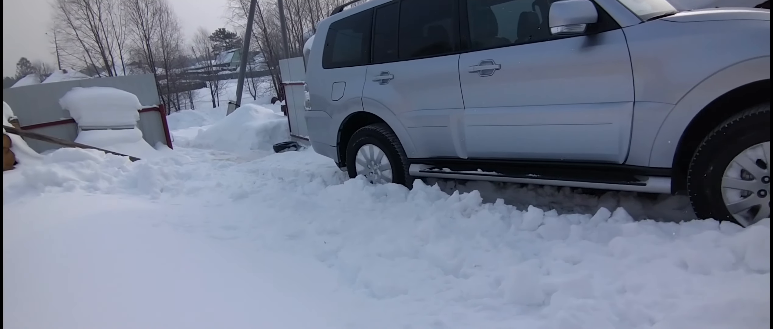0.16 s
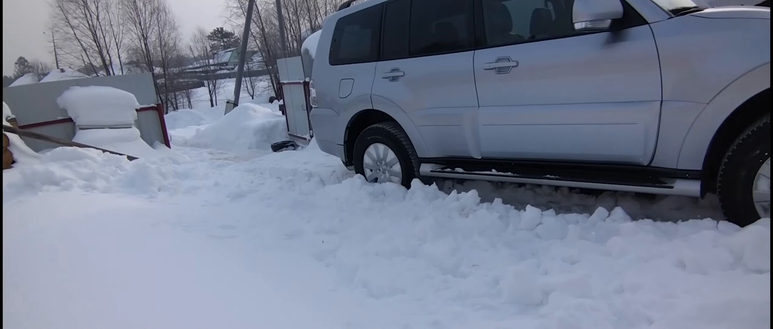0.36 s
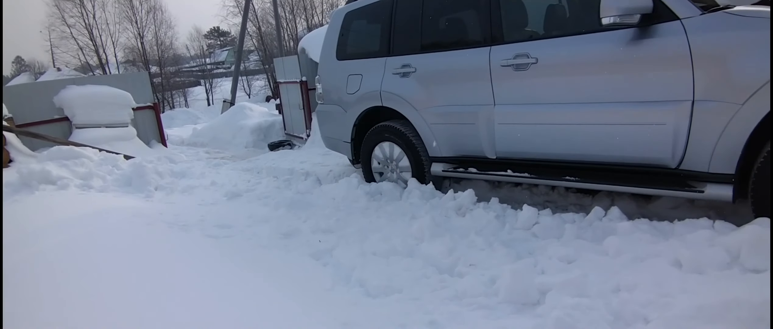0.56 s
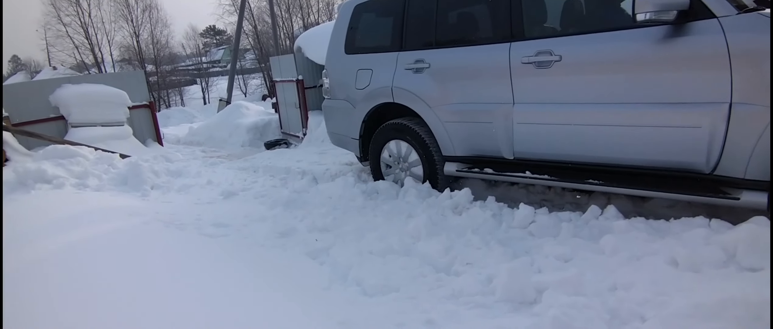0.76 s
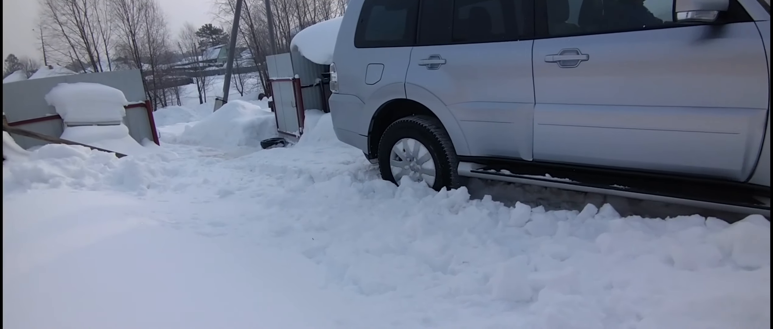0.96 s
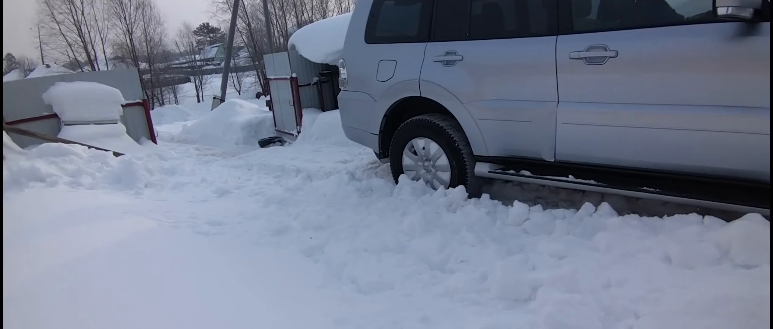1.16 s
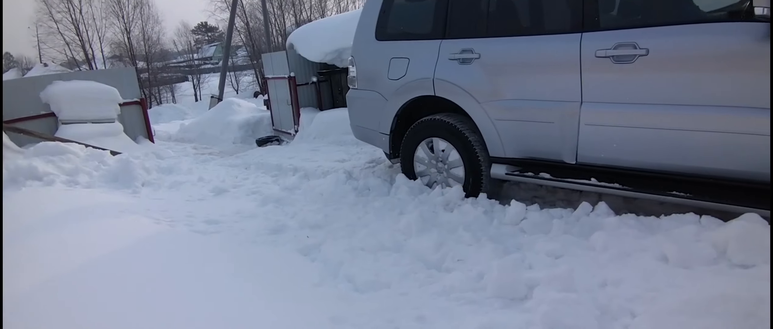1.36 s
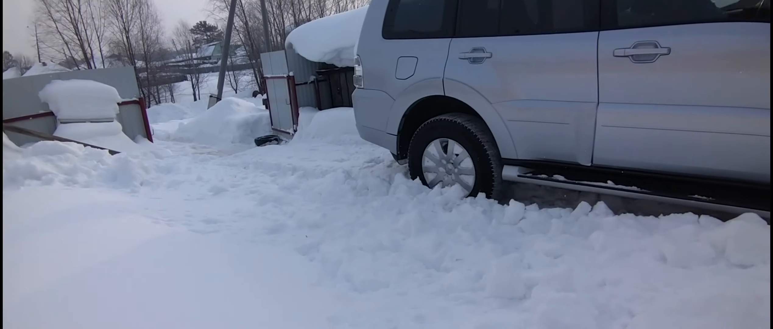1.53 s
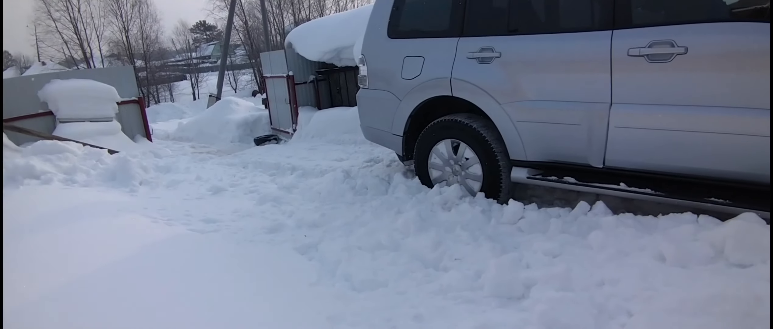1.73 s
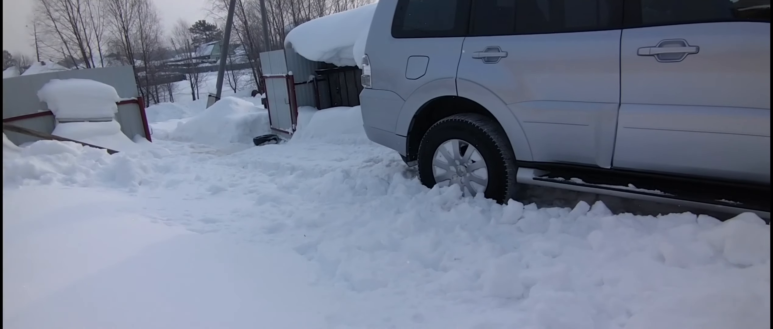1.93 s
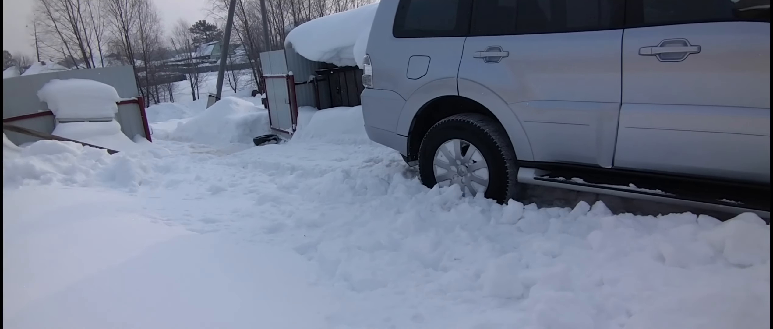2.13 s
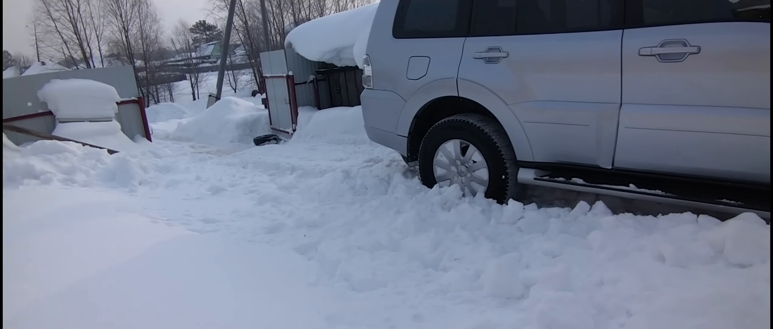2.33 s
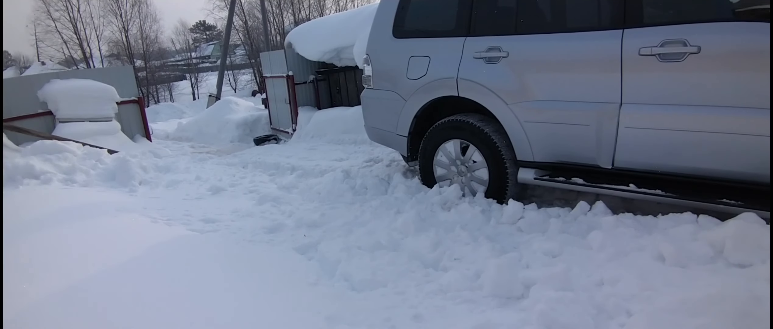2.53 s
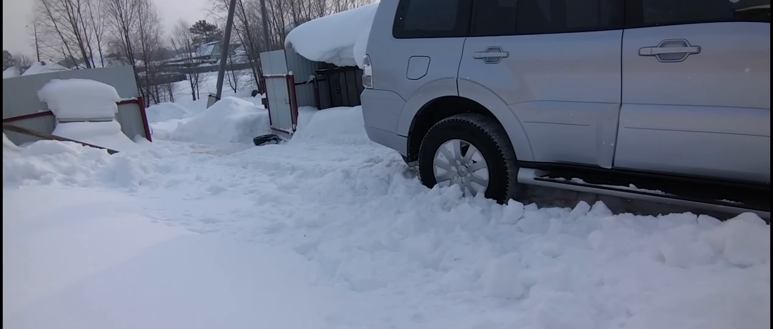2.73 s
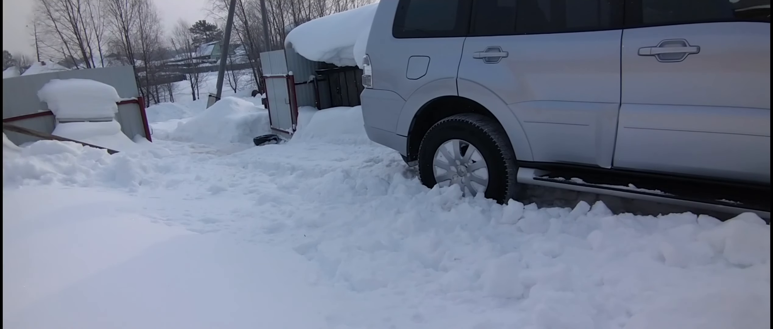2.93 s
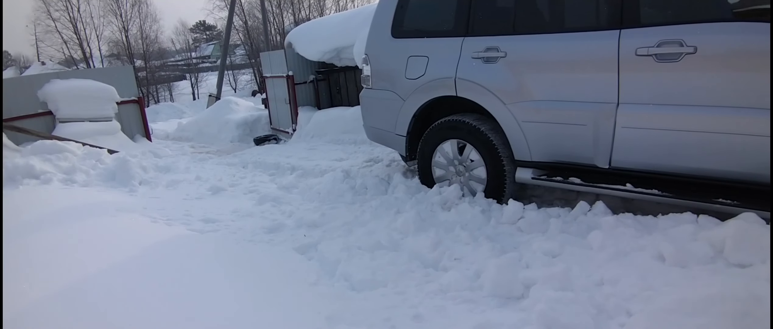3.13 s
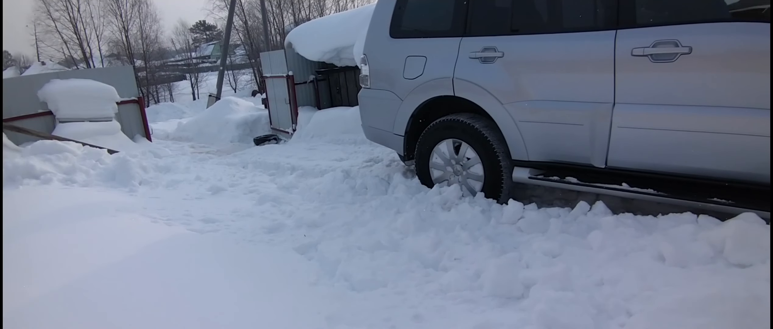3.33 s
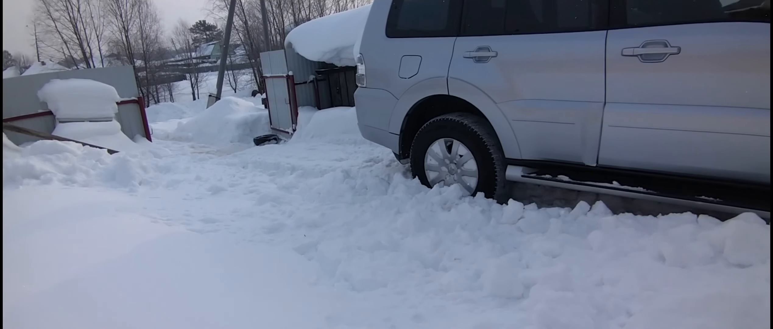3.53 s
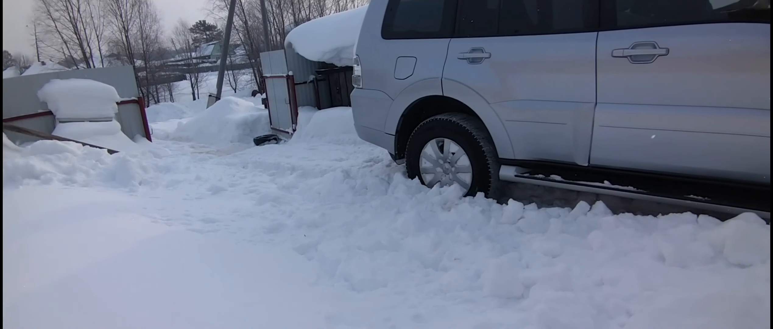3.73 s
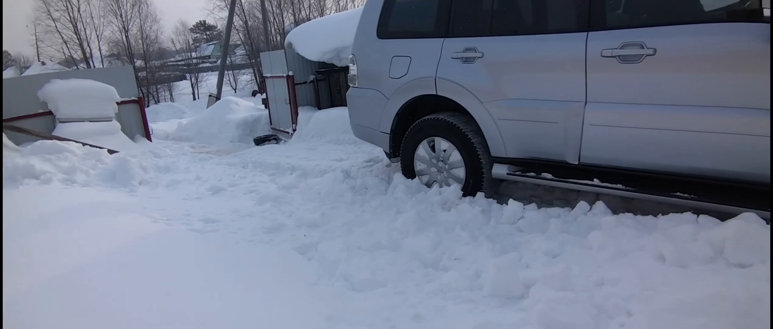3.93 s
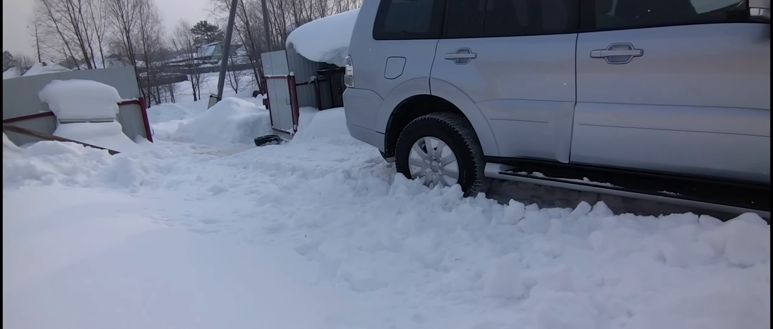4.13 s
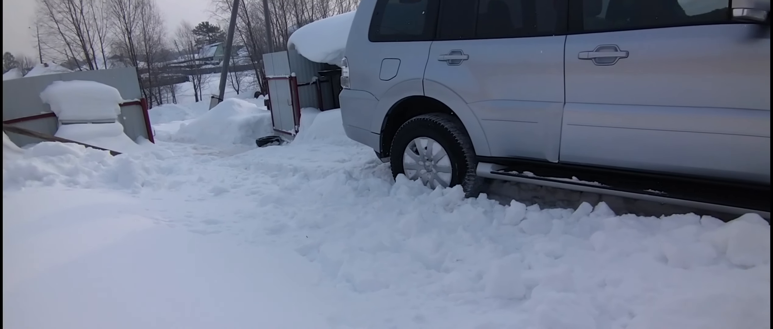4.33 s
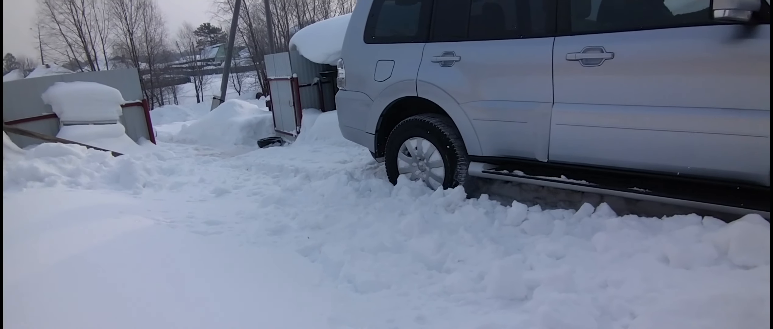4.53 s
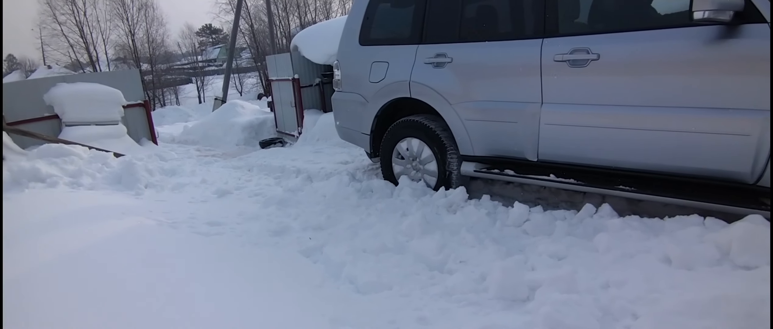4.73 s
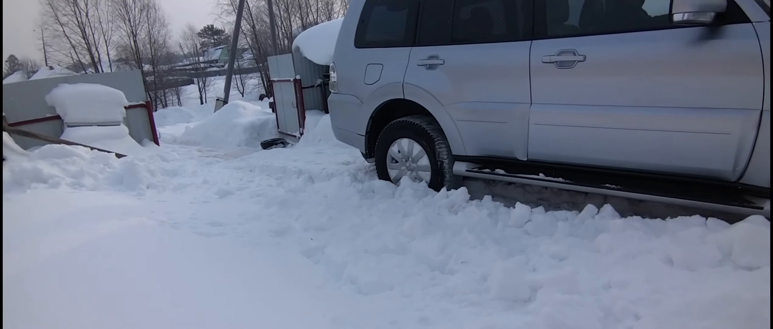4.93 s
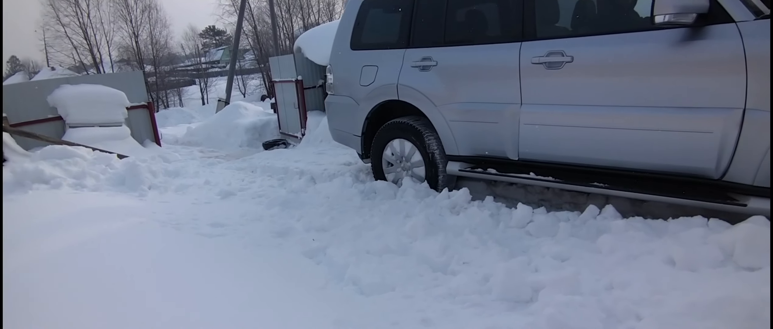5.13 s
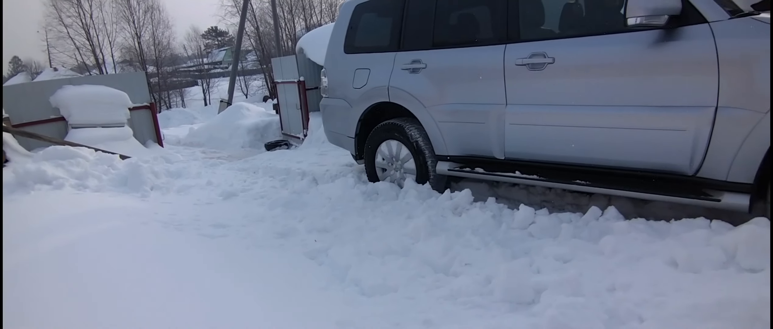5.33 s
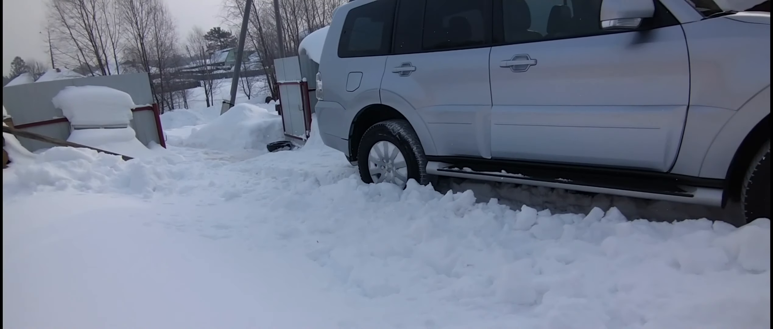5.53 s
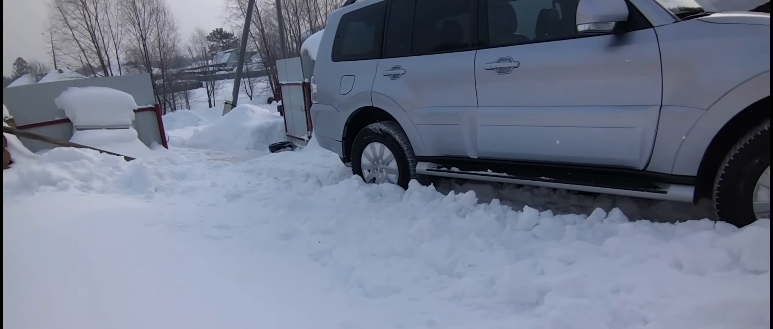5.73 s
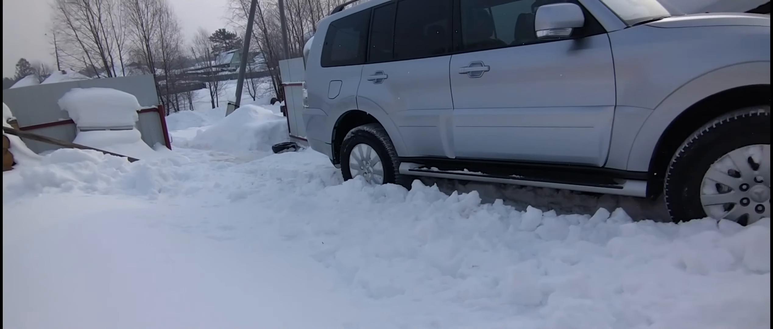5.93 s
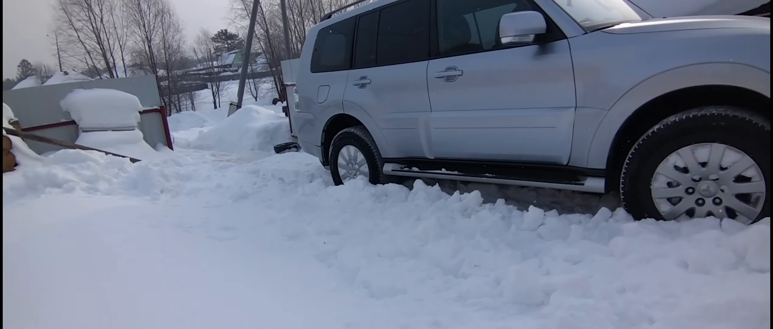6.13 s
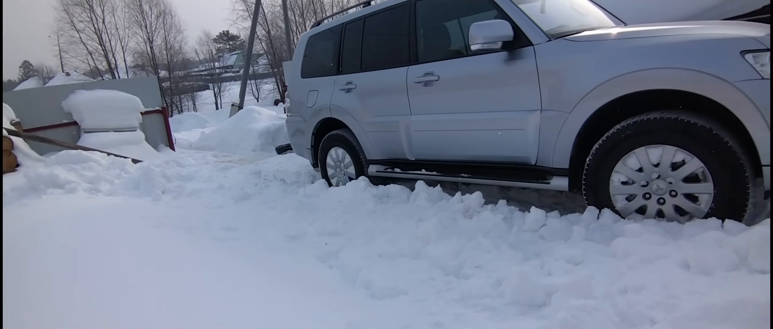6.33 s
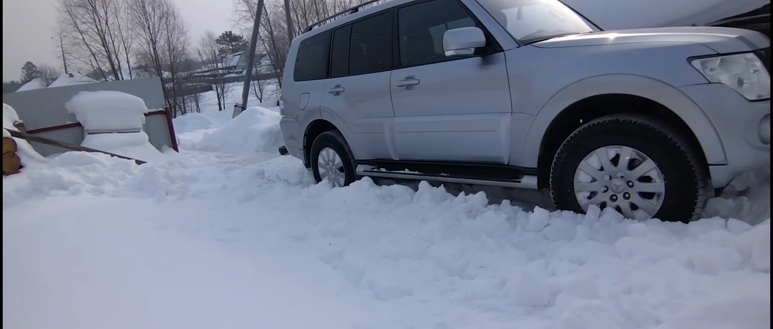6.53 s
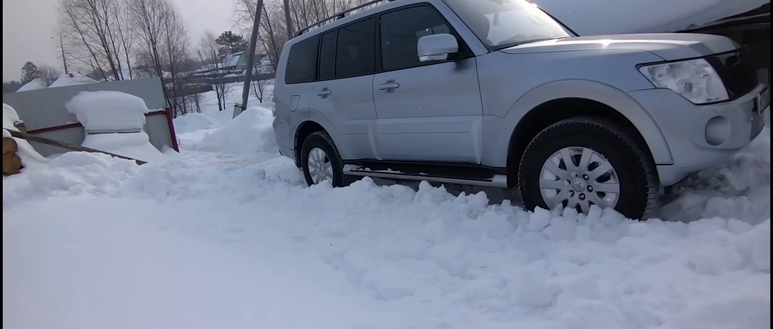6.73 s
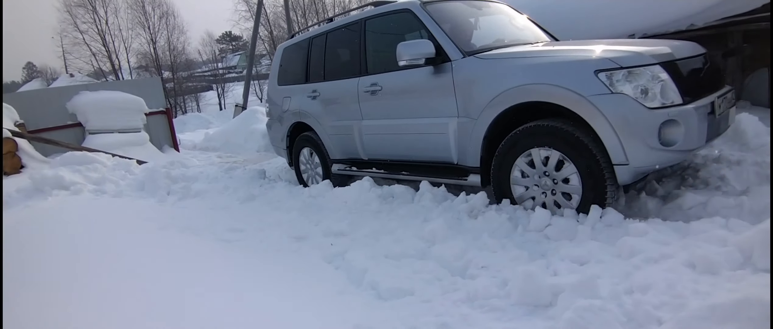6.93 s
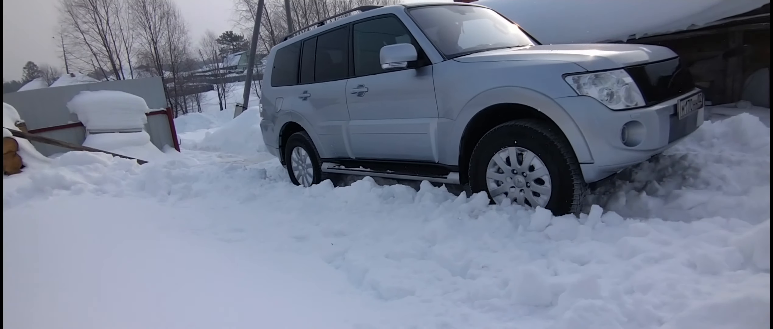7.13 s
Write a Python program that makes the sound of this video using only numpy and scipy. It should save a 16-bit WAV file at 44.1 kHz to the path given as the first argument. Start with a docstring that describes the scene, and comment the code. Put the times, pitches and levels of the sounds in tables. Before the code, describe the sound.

A diesel SUV clatters and crunches through deep snow, drops to an idle, then revs and groans its way back out.

```python
"""Diesel car in deep snow

A four-cylinder diesel SUV crawls through deep snow, stops at idle, then backs out again.
Engine: exhaust pulses at each firing, blows ringing in sump, head and block, a hum and a fan whirr.
Tyres: random collapses make the crunch, stick-slip the groans, moans and creaks; noise swells squeak and hiss.
Slipping treads throw a hiss of crystals; a faint low wind flutters at each microphone."""
import sys
import numpy as np
from scipy import signal
from scipy.fft import rfft, irfft, next_fast_len
from scipy.io import wavfile
from scipy.ndimage import uniform_filter1d, map_coordinates

SR = 44100
rng = np.random.default_rng(int(sys.argv[2]) if len(sys.argv) > 2 else 0)


def generate_wav(signal):
    """Clip the signal to [-1, 1] and save it as 16-bit WAV at the path in sys.argv[1]."""
    frames = np.transpose(np.atleast_2d(signal))
    scaled = np.clip(frames, -1, 1) * 32767
    pcm = np.round(scaled).astype(np.int16)
    wavfile.write(sys.argv[1], SR, pcm)


N = 320593
TIME_S = np.arange(N) / SR


def from_db(db):
    """Amplitude factor for a level in dB."""
    return 10 ** (np.asarray(db) / 20)


def rms_one(x):
    """Scale to rms 1 over all channels."""
    return x / np.sqrt(np.mean(x ** 2) + 1e-20)


def in_time(rows):
    """Each column of a curve, interpolated sample by sample."""
    time_s, *columns = np.transpose(rows)
    return [np.interp(TIME_S, time_s, column) for column in columns]


def at_hz(points, hz):
    """Gain of a spectrum at the given frequencies, interpolated over log frequency."""
    point_hz, db = np.transpose(points)
    return from_db(np.interp(np.log(hz + 1e-9), np.log(point_hz), db))


def colour(x, spectrum):
    """Shape a sound by a spectrum; rms 1."""
    size = next_fast_len(N + 8000)
    gain = at_hz(spectrum, np.fft.rfftfreq(size, 1 / SR))
    shaped = irfft(rfft(x, size) * gain, size)
    return rms_one(shaped[..., :N])


def lowpass(x, order, hz):
    """Butterworth low-pass."""
    return signal.sosfilt(signal.butter(order, hz, fs=SR, output="sos"), x)


def resonance(x, hz, width_hz):
    """Two-pole resonance with gain 1 on top."""
    r = np.exp(-np.pi * width_hz / SR)
    numerator = np.array([1, 0, -1]) * (1 - r * r) / 2
    return signal.lfilter(numerator, [1, -2 * r * np.cos(2 * np.pi * hz / SR), r * r], x + 1e-18)


def double_resonance(x, hz, width_hz):
    """A resonance followed by another of twice the width."""
    return resonance(resonance(x, hz, width_hz), hz, 2 * width_hz)


def die_away(x, seconds):
    """Every click becomes an exponential tail."""
    return signal.lfilter([1], [1, -np.exp(-1 / (seconds * SR))], x + 1e-18)


def ringing(x, hz, width_hz):
    """A resonance whose centre may move; rms 1."""
    turn = np.exp(2j * np.pi * np.cumsum(hz) / SR)
    return rms_one(np.real(turn * die_away(x / turn, 1 / (np.pi * width_hz))))


def drift(per_s):
    """Random wander with rms 1, drawn per_s times a second and joined by lines."""
    return rms_one(np.interp(TIME_S * per_s, np.arange(4000), rng.standard_normal(4000)))


def even(x):
    """Hold the level at 1 over an eighth of a second, keeping the grain."""
    return x / np.sqrt(uniform_filter1d(x ** 2, size=SR // 8) + 1e-6)


def grains(per_s, spread_db):
    """Random clicks of uneven size and sign."""
    sizes = from_db(spread_db * np.minimum(rng.exponential(1, N), 4))
    return (rng.random(N) < per_s / SR) * sizes * rng.choice([-1, 1], N)


def ticks(cycles):
    """A unit click whenever a whole cycle is completed."""
    return np.diff(np.floor(cycles), prepend=np.floor(cycles[0]))


def swell(centre_s, half_length_s):
    """A bell-shaped rise and fall around a moment; top 1."""
    return np.exp(-2 * ((TIME_S - centre_s) / half_length_s) ** 2)


def place(x, lag_ms, pan_db):
    """A source to the right reaches the left ear later and weaker."""
    left = map_coordinates(x, [np.arange(N) - lag_ms * SR / 1000], order=3, mode="nearest")
    return np.array([left, x]) * from_db(np.array([[pan_db], [-pan_db]]) / 2)


# Wind spectrum. Each row: frequency in Hz, relative level in dB per Hz.
WIND_SPECTRUM = [(10, -3), (22, 15), (34, -2), (60, -35), (150, -56), (400, -90)]


def wind(level_db=-57, gust_db=3):
    """Low coloured noise with slow gusts, different at each microphone."""
    return from_db(level_db + gust_db * drift(2.9)) * colour(rng.standard_normal((2, N)), WIND_SPECTRUM)


# Coarse crystals' hiss. Each row: frequency in Hz, relative level in dB per Hz.
SPIN_SPECTRUM = [(1200, -16), (2600, 7), (3400, -2), (4700, 12), (5500, 5), (6200, 9), (7600, -7),
                 (8800, 1), (11500, -1), (13500, 2), (16000, 3)]
SPIN_START_S, SPIN_END_S, SPIN_ATTACK_S, SPIN_RELEASE_S = 6.215, 6.68, 0.02, 0.07


def wheelspin(per_s=14000, spread_db=0.0, level_db=-55.5):
    """The spinning front wheel flings coarser crystals: one direct path, one scattered path for each ear."""
    attack = (TIME_S - SPIN_START_S) / SPIN_ATTACK_S
    release = (SPIN_END_S - TIME_S) / SPIN_RELEASE_S
    spinning = np.clip(np.minimum(attack, release), 0, 1)
    clicks = np.array([grains(per_s, spread_db) for _ in range(3)])
    return from_db(level_db) * spinning * colour(clicks, SPIN_SPECTRUM)


# Thrown crystals. Each row: time in seconds, relative level in dB.
SPRAY_LEVEL = [(0.0, -66.5), (0.03, -68), (0.92, -71.5), (0.98, -66.5), (1.63, -64), (2.14, -73),
               (2.87, -79.5), (4.2, -64.5), (4.37, -70.5), (5.35, -70), (5.9, -67.5), (6.1, -73.5),
               (6.7, -73), (7.27, -71)]
# Crystals' hiss. Each row: frequency in Hz, relative level in dB per Hz.
SPRAY_SPECTRUM = [(1000, -15), (2500, 11), (3400, 8), (4000, 8), (4800, 8.5), (5500, 5.5), (6200, 10.5),
                  (7000, 3.5), (7650, -4), (8600, 0.5), (11500, -3), (13500, 0), (16000, 2.5)]


def spray(lag_ms, level_db=9, per_s=26000, spread_db=1.0, flutter_db=1.5, direct_db=-3, pan_db=-6,
          treble_hz=7500, treble_db_per_ms=15, neutral_ms=0.37):
    """Ice crystals patter on wheel arches and snow, brighter as the front wheel comes into view."""
    crystals = colour(np.array([grains(per_s, spread_db) for _ in range(3)]), SPRAY_SPECTRUM)
    treble_filter = signal.butter(4, treble_hz, "high", fs=SR, output="sos")
    treble = signal.sosfiltfilt(treble_filter, crystals)
    crystals = crystals + treble * (from_db(treble_db_per_ms * (neutral_ms - lag_ms)) - 1)
    thrown = crystals * from_db(level_db + in_time(SPRAY_LEVEL)[0]) + wheelspin()
    thrown = thrown * from_db(flutter_db * drift(60))
    return from_db(direct_db) * place(thrown[0], lag_ms, pan_db) + thrown[1:]


# Soft collapsing snow. Each row: frequency in Hz, relative level in dB per Hz.
CRUNCH_SPECTRUM = [(100, -4), (200, -2), (280, -0.5), (400, -3), (550, -11.5), (750, -18), (1000, -24.5),
                   (1500, -52), (3000, -67)]
# Gritty crust. Each row: frequency in Hz, relative level in dB per Hz.
GRIT_SPECTRUM = [(300, 1), (700, 7.5), (950, 0.5), (1400, -2.5), (2500, -11), (6000, -24), (8000, -42)]
# Crispness, greatest where the wheels break out of rest. Each row: time in seconds, grit over crunch in dB.
CRISPNESS_CURVE = [(0, -4.5), (.7, -10), (2.1, -7.5), (3.0, 1.5), (3.5, -9), (4.0, -5.5), (4.7, -7.5),
                   (7.27, -12.5)]


def crunch(per_s=520, spread_db=2.5, clump_db=3.0, lump_db=0.78, grit_per_s=2500, grit_spread_db=3):
    """Snow fails under one tyre lump by lump, in clumps of tiny collapses; crisp crust adds finer grit."""
    clumps = from_db(clump_db * drift(60))
    soft = even(colour(grains(per_s * clumps, spread_db), CRUNCH_SPECTRUM))
    grit = even(colour(grains(grit_per_s * clumps, grit_spread_db), GRIT_SPECTRUM))
    lumps = rms_one(from_db(lump_db * drift(32)))
    return (soft + from_db(in_time(CRISPNESS_CURVE)[0]) * grit) * lumps


# Crust giving way. Each row: time in seconds, relative level in dB.
SLUMP_EVENTS = [(0.284, -29.5), (0.799, -34), (0.942, -25), (1.152, -27), (2.89, -38.5), (2.926, -43),
                (3.281, -34), (3.373, -29.5), (3.436, -31), (3.517, -36), (3.997, -31), (4.758, -30),
                (4.852, -35), (5.098, -28), (5.378, -30), (5.578, -30), (5.794, -26.5), (6.211, -28),
                (6.396, -30), (6.536, -33), (6.555, -34), (6.656, -36), (6.696, -44), (7.152, -31),
                (7.198, -31)]


def slumps(level_db=-1, thud_hz=230, width_hz=330, soft_hz=800):
    """A slab of crust breaks with a short dull thud."""
    clicks = np.zeros(N)
    for start_s, db in SLUMP_EVENTS:
        clicks[round(start_s * SR)] = from_db(db)
    thuds = lowpass(resonance(clicks, thud_hz, width_hz), 2, soft_hz)
    return -from_db(level_db) * thuds * clicks.max() / np.abs(thuds).max()


# Squeaks and hisses at the tyres.
# Each row: centre in seconds, half-length in seconds, frequency in Hz, width in Hz, level at the top in dB.
SQUEAK_EVENTS = [(1.103, 0.2, 5600, 1790, -60), (3.046, 0.063, 1890, 800, -57),
                 (3.595, 0.012, 1980, 400, -59), (3.847, 0.39, 5600, 1400, -76),
                 (5.688, 0.014, 5370, 1800, -52), (6.865, 0.049, 6100, 550, -61),
                 (7.18, 0.076, 2070, 346, -58)]


def squeaks_and_hisses():
    """Swells of noise, from short squeaks to long broad hiss."""
    out = np.zeros(N)
    for centre_s, half_length_s, hz, width_hz, db in SQUEAK_EVENTS:
        noise = double_resonance(rng.standard_normal(N), hz, width_hz)
        out += from_db(db) * rms_one(noise) * swell(centre_s, half_length_s)
    return out


# Tread blocks letting go. Each row: start in seconds, length in seconds, frequency in Hz, peak in dB.
CREAK_EVENTS = [(3.057, 0.058, 1795, -52), (3.463, 0.037, 692, -39), (3.513, 0.0089, 800, -41),
                (3.586, 0.041, 570, -42.5), (6.728, 0.018, 735, -38), (6.768, 0.017, 700, -47)]


def creaks(attack_s=0.0019, waver_hz=70):
    """Quick stick and slip on packed snow: a rough tone that starts quickly and runs out."""
    out = np.zeros(N)
    for start_s, length_s, hz, db in CREAK_EVENTS:
        age_s = TIME_S - start_s
        strength = np.clip(age_s / attack_s, 0, 1) * np.clip(1 - (age_s / length_s) ** 2, 0, 1)
        phase = 2 * np.pi * np.cumsum(hz + waver_hz * drift(400)) / SR
        out += from_db(db) * strength * np.sin(phase)
    return out


# Crust plates cracking. Each row: start in seconds, decay in seconds, frequency in Hz, peak in dB.
CRACK_EVENTS = [(0.942, 0.0077, 590, -38.5), (2.9, 0.032, 480, -46.5), (3.419, 0.012, 935, -37.5),
                (3.426, 0.015, 546, -37), (3.519, 0.0083, 333, -32), (3.997, 0.004, 720, -39.5),
                (5.374, 0.0034, 694, -40), (5.793, 0.0023, 720, -39), (6.702, 0.005, 600, -38),
                (6.772, 0.0065, 647, -41.5)]


def cracks(width_share=0.49):
    """A plate of crust under the car breaks in a run of fractures that starts at once and dies away."""
    out = np.zeros(N)
    for start_s, decay_s, hz, db in CRACK_EVENTS:
        age_s = TIME_S - start_s
        fade = np.exp(-np.minimum((age_s / decay_s) ** 2, 20))
        run = (age_s >= 0) * fade * rng.choice([-1, 1], N)
        width_hz = width_share * hz
        crack = resonance(resonance(run, hz, width_hz), hz, width_hz)
        out += from_db(db) * crack / np.abs(crack).max()
    return out


# Boom of a loaded tyre. Each row: frequency in Hz, width in Hz, relative level in dB.
TYRE_MODES = [(125.9, 23.3, 1), (161.2, 59, -3), (187.6, 25, -11)]


def groan(slip_hz=155, wander=0.22, uneven_db=3):
    """The tread sticks and slips unevenly, and the tyre booms."""
    cycles = np.cumsum(slip_hz * np.exp(wander * drift(150))) / SR
    slips = ticks(cycles) * from_db(uneven_db * rng.standard_normal(N))
    return even(sum(from_db(db) * double_resonance(slips, hz, width_hz) for hz, width_hz, db in TYRE_MODES))


# Moans of a loaded tyre, one curve for each. Each row: time in seconds, pitch in Hz, level in dB.
MOAN_CURVES = [
    [(1.38, 135, -49), (1.48, 157, -39.5), (1.6, 137, -43)],
    [(3.47, 145.4, -55), (3.54, 159, -36), (3.63, 145, -47)],
    [(4.02, 151.5, -44), (4.14, 152.2, -34.5), (4.2, 140, -42), (4.255, 150.5, -33.5), (4.3, 166.3, -34.5),
     (4.355, 165.7, -33), (4.41, 180.1, -41), (4.47, 168.1, -40), (4.555, 147.3, -35), (4.63, 176.5, -35),
     (4.695, 152.3, -31), (4.78, 137.3, -54)],
]


def moans(flutter_db=1.0, octave_db=-17, jitter=.022, fade_s=.02):
    """The slipping locks into a tone, with its octave, that glides and swells."""
    out = np.zeros(N)
    for curve in MOAN_CURVES:
        hz, db = in_time(curve)
        to_nearest_end_s = np.minimum(TIME_S - curve[0][0], curve[-1][0] - TIME_S)
        sounding = np.clip(to_nearest_end_s / fade_s, 0, 1)
        phase = 2 * np.pi * np.cumsum(hz * (1 + jitter * drift(120))) / SR
        out += from_db(db) * sounding * (np.sin(phase) + from_db(octave_db) * np.sin(2 * phase))
    return out * from_db(flutter_db * drift(50))


# Rolling tyres. Each row: frequency in Hz, relative level in dB per Hz.
RUMBLE_SPECTRUM = [(12, -28), (26, -26), (45, 7.5), (70, 11), (120, 9.5), (150, 4.5), (260, -48)]
# Swells of low rumble. Each row: centre in seconds, half-length in seconds, level in dB.
RUMBLE_SWELLS = [(0.587, 0.043, -36), (1.64, 0.095, -33), (3.065, 0.032, -39), (5.94, 0.077, -34.5),
                 (6.48, 0.41, -39.5)]


def rumble(pace_db, level_db=-42, per_pace=0.86, uneven_db=1.0):
    """The tyres roll over lumps, and the rumble swells at set moments."""
    rolling = from_db(level_db + per_pace * pace_db + uneven_db * drift(12))
    swells = sum(from_db(db) * swell(centre_s, half_s) for centre_s, half_s, db in RUMBLE_SWELLS)
    return np.hypot(rolling, swells) * even(colour(grains(500, 4.8), RUMBLE_SPECTRUM))


# Wheels packing snow, at rest between drive in and drive out. Each row: time in seconds, relative level in dB.
PACKING_CURVE = [(0.05, -45), (0.23, -44.5), (1.11, -43.5), (1.86, -45), (2.02, -45.5), (2.2, -60.5),
                 (2.88, -67), (2.9, -56), (3.14, -52.5), (3.51, -44), (3.59, -45.5), (6.72, -42.5),
                 (6.96, -44.5), (7.2, -43.5)]
FULL_PACKING_DB = -44  # table level at a steady crawl


def tyres(lag_ms, crunch_db=-43.0, crunch_per_pace=1.36, groan_db=-44, groan_per_pace=1.24, groan_uneven_db=2.0,
          rear_db=-6, rear_lag_ms=0.028, pan_db=-0.5, locked_db=-29):
    """Crunch, groan and rumble follow the wheels' pace; the groan gives way when the slip locks into a moan."""
    pace_db = in_time(PACKING_CURVE)[0] - FULL_PACKING_DB
    packing = from_db(crunch_db + crunch_per_pace * pace_db)
    moan = moans()
    locked = uniform_filter1d(moan ** 2, size=SR // 30) / from_db(locked_db) ** 2
    groan_level = from_db(groan_db + groan_per_pace * pace_db + groan_uneven_db * drift(12)) / (1 + 2 * locked)
    weight = groan_level * groan() + moan + rumble(pace_db)
    # front wheel beside the engine, rear wheel nearly straight ahead
    front = place(packing * crunch() + slumps() + squeaks_and_hisses() + creaks(), lag_ms, pan_db)
    rear = place(from_db(rear_db) * packing * crunch(), rear_lag_ms, 0)
    return front + rear + place(weight, 0.74 * lag_ms, pan_db) + place(cracks(), 0.62 * lag_ms, pan_db)


COMBUSTION_SHARE = .54  # of the firing cycle
IDLE_FIRINGS_PER_S, FULL_FIRINGS_PER_S = 21.5, 32


def revving(firing_hz):
    """Engine speed from 0 at idle to 1 at full speed."""
    return (firing_hz - IDLE_FIRINGS_PER_S) / (FULL_FIRINGS_PER_S - IDLE_FIRINGS_PER_S)


def advance(firing_hz, share=.035):
    """Injection comes earlier in the cycle as the engine speeds up."""
    return share * revving(firing_hz)


def hum(cycles, hz=727, level_db=-67.5, waver=.018, throb=.45):
    """A thin wavering whine from the engine bay, shaken by the firings."""
    phase = 2 * np.pi * np.cumsum(hz * (1 + waver * drift(150))) / SR
    shake = 1 + throb * np.cos(2 * np.pi * (cycles - COMBUSTION_SHARE))
    return np.sqrt(2) * from_db(level_db) * np.sin(phase) * shake


# Deep engine block resonances. Each row: frequency in Hz, width in Hz, relative level in dB.
BLOCK_MODES = [(375, 23, 1), (397, 22, 1.5), (473, 31, -4)]


def block(cycles, level_db=-64, timing=.012):
    """Each combustion sets the block ringing with a hollow pulsing note."""
    pulses = ticks(cycles - COMBUSTION_SHARE + timing * drift(25))
    rings = sum(from_db(db) * resonance(pulses, hz, width_hz) for hz, width_hz, db in BLOCK_MODES)
    return from_db(level_db) * rms_one(rings)


# Exhaust pipe response. Each row: frequency in Hz, relative gain in dB.
PIPE_RESPONSE = [(20, -18), (31, -0.5), (43, -2), (64, -4), (86, 1.5), (100, -6), (112, -14.5), (135, -36),
                 (220, -32)]


def exhaust(firing_hz, cycles, load_db, idle_db=-50, travel_s=0.0166, rough=0.14, dispersion=0.14):
    """Each combustion sends a pulse down the pipe, which passes its lowest orders; a suck precedes the push."""
    at_tailpipe = cycles - COMBUSTION_SHARE - travel_s * firing_hz
    orders = np.zeros(N)
    for order in range(1, 10):
        phase = 2 * np.pi * (order * at_tailpipe - dispersion)
        orders += at_hz(PIPE_RESPONSE, order * firing_hz) * np.cos(phase)
    return np.sqrt(2) * orders * from_db(idle_db + load_db) * (1 + rough * drift(25))


def wheel_shade(lag_ms, depth_db=9, edge_ms=0.34, softness_ms=0.033):
    """Loss in dB as the front wheel comes between the source and the listener."""
    return depth_db * (1 + np.tanh((edge_ms - lag_ms) / softness_ms)) / 2


def arch_opening(lag_ms, gain_db=2, centre_ms=0.32, width_ms=0.05):
    """Gain in dB while the open wheel arch faces the listener."""
    return gain_db * np.exp(-((lag_ms - centre_ms) / width_ms) ** 2)


def engine_levels(firing_hz, load_db, lag_ms, sump_db=-62.5, head_db=-64.0, whirr_db=-58.5,
                  sump_per_rev=0.89, sump_per_load=0.26, head_per_rev=0.17, whirr_per_rev=0.97):
    """Gains of sump, head and fan: each rises from idle with speed, the sump also with load (dB per dB)."""
    revs_db = 20 * np.log10(firing_hz / IDLE_FIRINGS_PER_S)
    return from_db([sump_db + sump_per_rev * revs_db + sump_per_load * load_db - wheel_shade(lag_ms),
                    head_db + head_per_rev * revs_db + arch_opening(lag_ms),
                    whirr_db + whirr_per_rev * revs_db])


# Blows within one firing: two pilot injections, combustion, piston slap, injector closing, pump, two valves seating.
# Each row: share of the cycle, relative dB in the sump, relative dB in the head, dB gained from idle to full speed.
BLOW_TABLE = [(.41, -19, -23, 11), (.475, -13, -15, 8), (.55, -2, 0, -1), (.61, 0, -4, 1), (.68, -9, -6, 0),
              (.83, -16, -15, 5), (.175, -5, -4.5, -5), (.28, -9, -9, 1)]
BLOW_SCATTER, CHATTER_PER_S = .007, 220  # timing scatter as share of the cycle; loose gear and chain contacts


def knocks(cycles, revs, column, knock_s, strike, chatter_db, uneven_db=1.0):
    """Blows on one part over loose gear chatter, each a hard contact and a dying rattle: one direct path, two scattered."""
    firing_db = .8 * rng.standard_normal(1000)[np.floor(cycles).astype(int)]
    blows = np.zeros(N)
    for row in BLOW_TABLE:
        hits = ticks(cycles - row[0] + BLOW_SCATTER * drift(25))
        blows += hits * from_db(row[column] + row[3] * revs)
    blows = blows * from_db(firing_db + uneven_db * rng.standard_normal(N))
    blows = blows + from_db(chatter_db) * np.abs(grains(CHATTER_PER_S, 1.8))
    rattle = rms_one(die_away(blows, knock_s)) * rng.choice([-1, 1], (3, N))
    rattle[0] += strike * rms_one(blows)
    return rattle


def casting(rattle, modes, muffle_hz=7000, radiates_hz=1150, mode_db=1.5):
    """A part rings in a varying mix of its modes, radiates little bass and is muffled by the bonnet; rms 1."""
    rings = 0
    for k, (hz, width_hz, db) in enumerate(modes):
        rings = rings + (-1) ** k * resonance(rattle * from_db(db + mode_db * drift(70)), hz, width_hz)
    rings = signal.sosfilt(signal.butter(3, radiates_hz, "high", fs=SR, output="sos"), rings)
    return rms_one(lowpass(rings, 4, muffle_hz))


def injectors(rattle, lag_ms, hz=4800, shift_hz_per_ms=1300, rest_ms=0.52, width_hz=370, level_db=-3.5, skirt_hz=900):
    """The injectors' tick rings higher as the car turns away from side on, and fades behind the front wheel."""
    moving_hz = hz + shift_hz_per_ms * (rest_ms - lag_ms)
    ring = ringing(resonance(rattle, hz + width_hz / 2, skirt_hz), moving_hz, width_hz)
    return ring * from_db(level_db - wheel_shade(lag_ms, depth_db=30, edge_ms=0.3, softness_ms=0.1))


def arch_ring(rattle, lag_ms, hz=2440, width_hz=200, level_db=-2, centre_ms=0.26, width_ms=0.053):
    """The hollow of the front wheel arch rings with the clatter as it passes."""
    facing = np.exp(-((lag_ms - centre_ms) / width_ms) ** 2)
    return from_db(level_db) * facing * rms_one(double_resonance(rattle, hz, width_hz))


# Sump and lower block resonances. Each row: frequency in Hz, width in Hz, relative level in dB.
SUMP_MODES = [(1512, 194, 4), (1786, 160, -3), (1934, 87, -4), (3680, 190, -7), (6060, 410, -9.5)]
# Cylinder head and cover resonances. Each row: frequency in Hz, width in Hz, relative level in dB.
HEAD_MODES = [(2415, 240, 1), (2690, 150, 5.5), (2990, 120, 1.5), (3860, 220, -5), (6480, 390, -9.5)]
# Hard edge of each blow on the head. Each row: frequency in Hz, relative gain in dB.
EDGE_SPECTRUM = [(1200, -20), (2700, 1), (4700, 3.5), (6400, -4.5), (7500, -10), (11000, -19), (15000, -20)]
# Fan, belts and intake. Each row: frequency in Hz, relative level in dB per Hz.
WHIRR_SPECTRUM = [(120, 5), (240, -32), (360, 12), (450, 9), (560, 3.5), (700, 10), (1150, -0.5),
                  (1550, -1.5), (1950, 4.5), (2170, -3), (2500, 0.5), (2900, 1), (3350, -8.5), (3900, 1),
                  (4300, -13), (5000, -2.5), (5500, -22), (6500, -23), (7600, -28), (11000, -50),
                  (16000, -37)]


def clatter(cycles, revs, levels, lag_ms, scatter_db=-1.5, pan_db=-3.5, edge_db=-7, scatter_from_hz=2600, low_loss=0.51):
    """Firings knock in sump and head over the whirr; part, mostly treble, scatters from under the body."""
    sump = knocks(cycles, revs, 1, knock_s=.005, strike=.4, chatter_db=-22)
    head = knocks(cycles, revs, 2, knock_s=.0056, strike=.42, chatter_db=-20)
    sump_level, head_level, whirr_level = levels
    whirr = colour((1 + .5 * np.abs(head[1])) * rng.standard_normal((3, N)), WHIRR_SPECTRUM)
    edge = from_db(edge_db) * colour(head, EDGE_SPECTRUM)
    top = casting(head, HEAD_MODES) + injectors(head, lag_ms) + arch_ring(head, lag_ms) + edge
    paths = sump_level * casting(sump, SUMP_MODES) + head_level * top + whirr_level * whirr
    scattered = paths[1:] - low_loss * lowpass(paths[1:], 1, scatter_from_hz)
    return place(paths[0], lag_ms, pan_db) + from_db(scatter_db) * scattered


# Engine speed. Each row: time in seconds, firings per second.
SPEED_CURVE = [(0.0, 31.81), (0.53, 30.62), (0.92, 23.22), (1.08, 24.62), (1.69, 21.95), (2.18, 21.76),
               (2.85, 21.07), (3.25, 24.05), (3.55, 20.09), (3.82, 26.01), (4.12, 29.6), (4.85, 30.83),
               (5.03, 32.4), (5.84, 33.72), (6.15, 21.5), (6.45, 24.42), (6.82, 22.32), (7.27, 21.96)]
# Engine load, driving exhaust throb and sump knock. Each row: time in seconds, dB over idle.
LOAD_CURVE = [(0, 0), (.8, -0.5), (1.55, 7.5), (2.1, 2), (2.4, 1), (2.8, -1.5), (3.0, 5), (3.3, 5),
              (3.6, 0), (4.5, 2.5), (5.2, 9), (5.8, 6), (6.2, 1.5), (7.27, 4)]
# Bearing of the bonnet. Each row: time in seconds, lag of the left ear in ms.
BEARING_CURVE = [(0, 0.35), (.7, 0.38), (1.7, 0.5), (4.2, 0.47), (4.8, 0.41), (5.3, 0.4), (6.05, 0.34),
                 (6.4, 0.27), (7.27, 0.14)]


def scene(wheel_bearing=0.97):
    """Engine and wheels pass together before a pair of microphones."""
    firing_hz, = in_time(SPEED_CURVE)
    load_db, = in_time(LOAD_CURVE)
    lag_ms, = in_time(BEARING_CURVE)
    cycles = np.cumsum(firing_hz) / SR
    background = wind() + spray(lag_ms) + tyres(wheel_bearing * lag_ms)
    low_engine = hum(cycles) + block(cycles) + exhaust(firing_hz, cycles, load_db)
    levels = engine_levels(firing_hz, load_db, lag_ms)
    rattling = clatter(cycles + advance(firing_hz), revving(firing_hz), levels, lag_ms)
    return background + place(low_engine, 0.55 * lag_ms, pan_db=-1.0) + rattling


def record(dry, cutoff_hz=15850):
    """A steep elliptic low-pass cuts the top."""
    return signal.sosfilt(signal.ellip(12, .1, 80, cutoff_hz, fs=SR, output="sos"), dry)


dry = scene()
out = record(dry)
generate_wav(out)
```